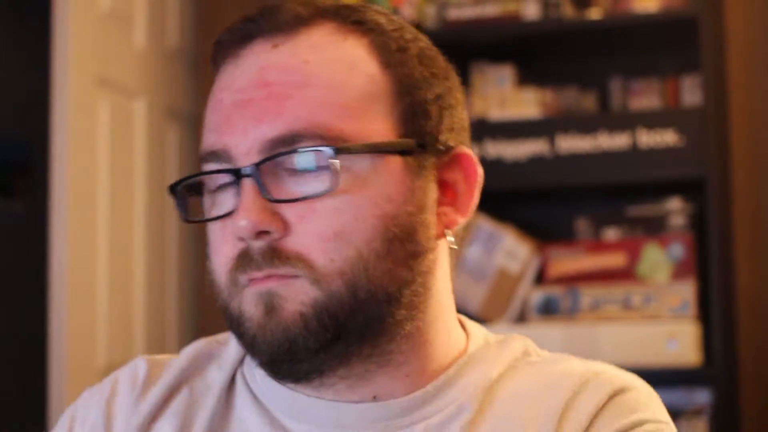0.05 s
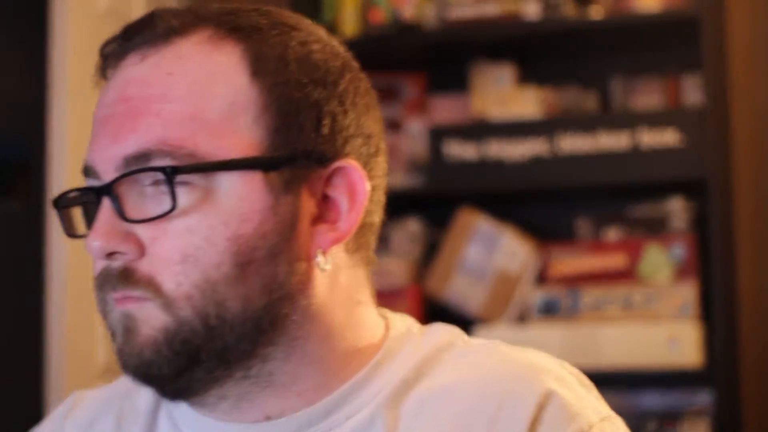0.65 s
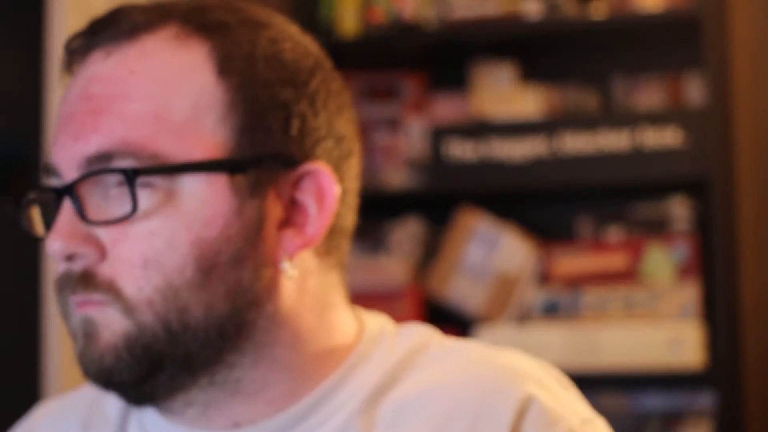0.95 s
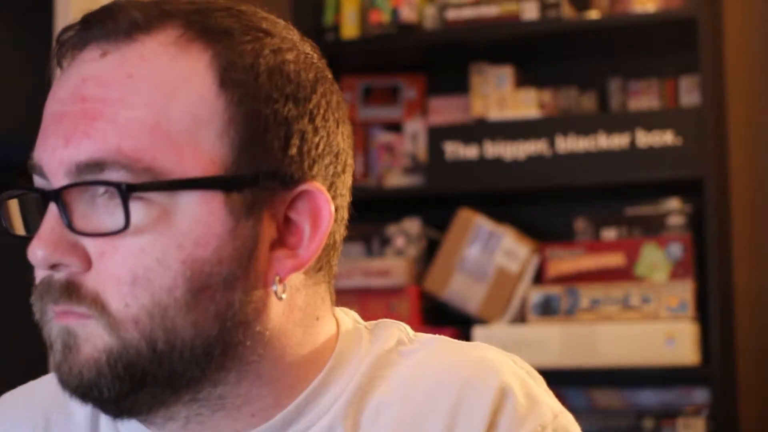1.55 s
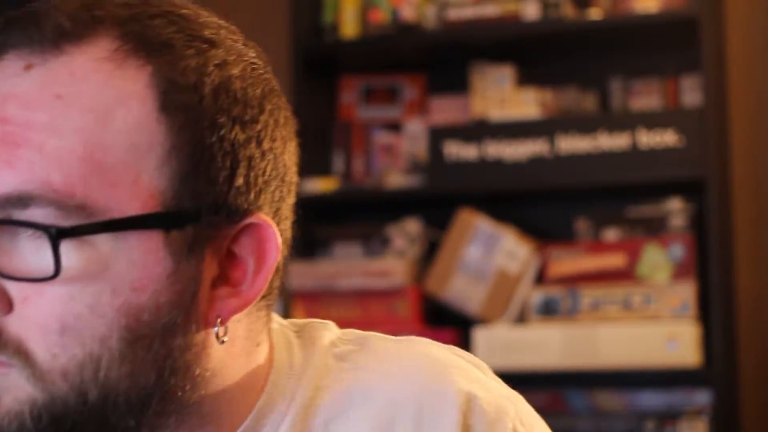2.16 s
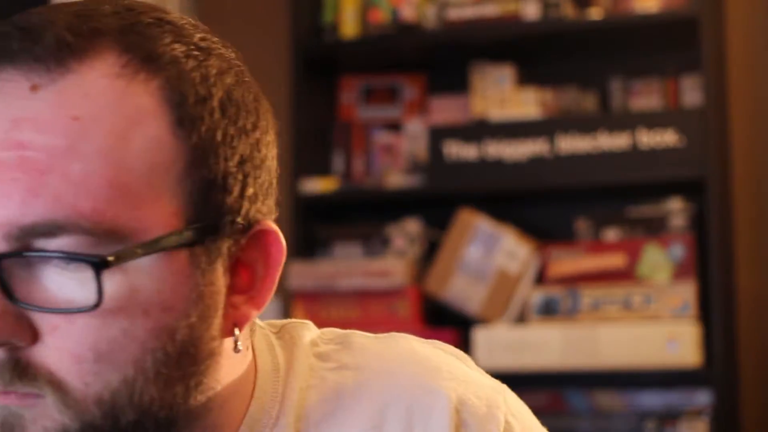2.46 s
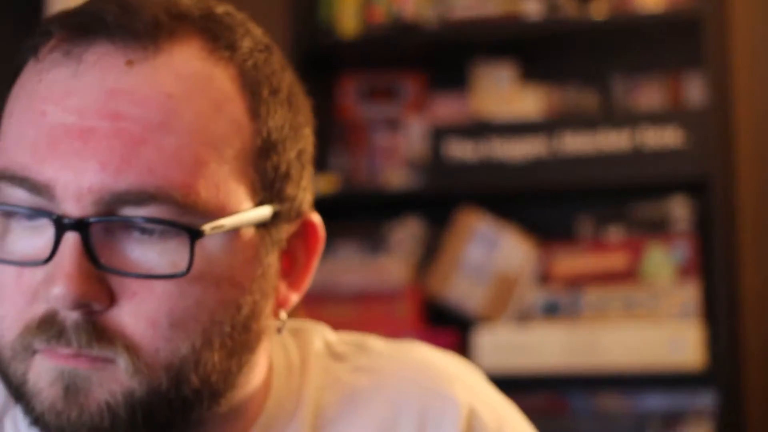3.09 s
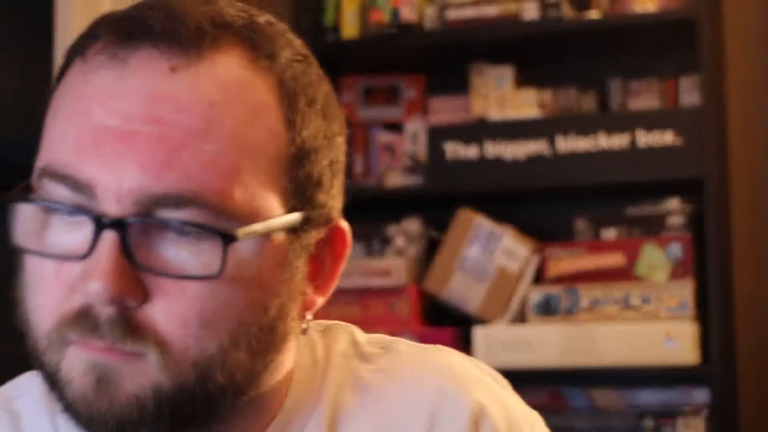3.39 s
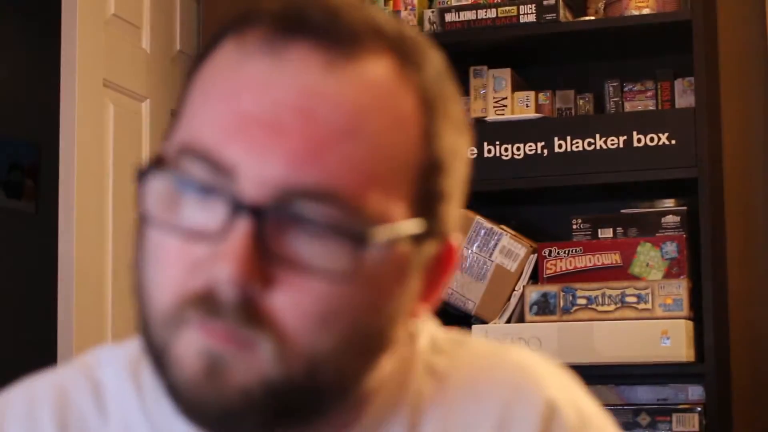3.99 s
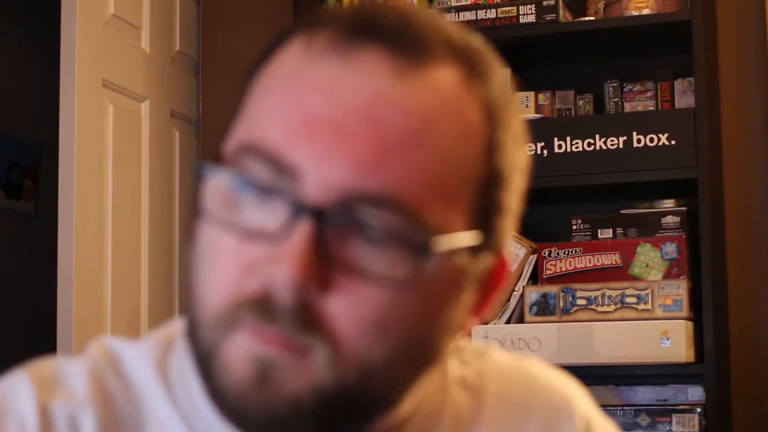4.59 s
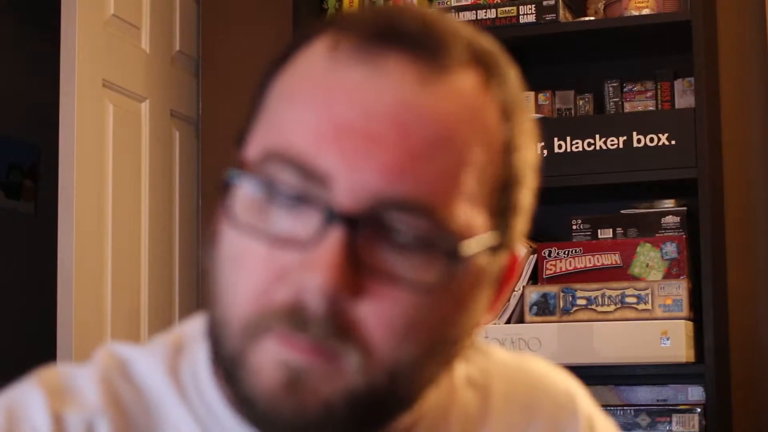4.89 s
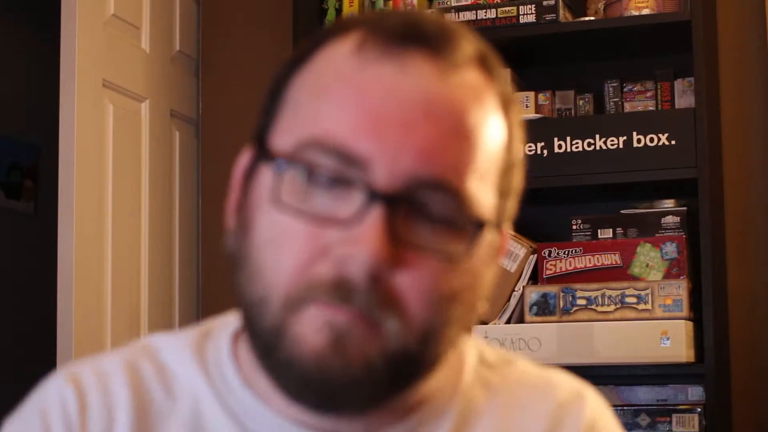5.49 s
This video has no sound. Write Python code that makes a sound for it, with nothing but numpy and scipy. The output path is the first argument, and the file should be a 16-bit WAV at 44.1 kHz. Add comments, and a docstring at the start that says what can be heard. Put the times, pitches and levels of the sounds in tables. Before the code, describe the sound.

A soft, low bump on a wooden table opens the sound, with a small metallic tink. A steel opener jingles in short, bright ticks from 0.2 to 0.4 seconds. At about 1.4 and 1.6 seconds it clinks against the cap and glass neck of a bottle, and at 1.7 seconds the cap snaps off sharply with a faint, thin hiss of gas. A firm knock on the tabletop comes at 2.6 seconds, then lighter taps and another firm knock at 3 seconds, which runs into a quick chatter of glass and metal until 3.2 seconds. After a quiet stretch with a faint tap or two, the cap is laid on the wood with light clacks around 5 seconds, followed by faint sliding until about 5.5 seconds. Everything sounds close, in a small room with a short tail and a soft, steady fan hum.

```python
"""A table in a small furnished room, where a beer bottle is opened.
A steel opener jingles, clinks against the crown cap and snaps it off with a wisp of gas.
Glass and metal then knock, chatter and slide on the wooden top. Each hard contact is a set of
ringing modes plus a short noise crack; soft bumps sway the table's lowest modes.
The room adds a short tail, and a fan hums softly underneath."""
import sys
import numpy as np
from scipy import signal
from scipy.fft import rfft, irfft, next_fast_len
from scipy.io import wavfile
from scipy.ndimage import uniform_filter1d

SR = 44100
rng = np.random.default_rng(int(sys.argv[2]) if len(sys.argv) > 2 else 0)


def inscribe(sig):
    """Save sig as 16-bit PCM at rate SR to the path in sys.argv[1].

    A 1-D sig is mono; a 2-D sig holds one channel per row.
    Samples are clipped to [-1, 1] before scaling.
    """
    pcm = np.round(np.clip(np.atleast_2d(sig).T, -1, 1) * 32767)
    wavfile.write(sys.argv[1], SR, pcm.astype(np.int16))


N = 253354
AGE = np.arange(SR // 2) / SR  # seconds since a hit

# EQ points of a hit (low, middle, high, top): low_db, high_db and top_db are relative to the middle
METAL_EQ_HZ, WOOD_EQ_HZ = (2500, 4800, 8500, 14000), (300, 1200, 3200, 9000)
# spectrum of the crack when the opener hits: freq_hz, level_db
STEEL_CRACK = [(200, -4), (1200, -7.5), (1900, 1.5), (3000, 1.5), (3600, -1.5), (4900, 4.5), (6800, -23),
               (8400, -2), (9800, -10), (10800, -21), (12000, -17), (16000, -17.5)]


def from_db(db):
    """Decibels to gain."""
    return 10 ** (np.asarray(db) / 20)


def at_hz(points, hz):
    """Read a table along a log-frequency axis."""
    known_hz, values = np.transpose(points)
    return np.interp(np.log(np.maximum(hz, 1)), np.log(known_hz), values)


def decay(t60):
    """An envelope that falls 60 dB in t60 seconds."""
    return np.exp(-np.log(1000) * AGE / max(t60, 1e-4))


def ring(hz, t60):
    """One struck mode: a decaying sine."""
    return np.sin(2 * np.pi * hz * AGE) * decay(t60)


def eq(x, spectrum):
    """Minimum-phase EQ, so that nothing rings ahead of an attack."""
    size = 2 * next_fast_len(len(x) // 2 + 2048)
    gain = from_db(at_hz(spectrum, np.fft.rfftfreq(size, 1 / SR)))
    cepstrum = irfft(np.log(gain))
    cepstrum[1:size // 2] *= 2
    cepstrum[size // 2 + 1:] = 0
    return irfft(rfft(x, size) * np.exp(rfft(cepstrum)))[:len(x)]


def noise(spectrum):
    """Steady coloured noise of rms 1."""
    x = eq(rng.standard_normal(N), spectrum)
    return x / x.std()


def flatten(x):
    """Level out broad peaks, so that a noise burst has no pitch of its own; energy 1."""
    hz = np.fft.rfftfreq(len(x), 1 / SR)
    power = uniform_filter1d(np.abs(rfft(x)) ** 2, size=40)
    power = np.maximum(power, power.mean() / 20)
    flat = eq(x, np.column_stack([hz + 1, -10 * np.log10(power)]))
    return flat / np.sqrt(np.sum(flat ** 2))


def unit_attack(x):
    """Scale to rms 1 over the first 4 ms."""
    return x / np.sqrt(np.mean(x[:SR // 250] ** 2))


def add(track, start_s, sound):
    """Mix a sound into the track."""
    start = max(round(start_s * SR), 0)
    track[start:start + len(sound)] += sound[:N - start]


def strikes(hits, modes, crack, eq_hz, crack_db, crack_t60, radiate_hz):
    """Each hit rings a body's main modes; a noise crack stands for the dense, quickly damped ones."""
    partials = np.array([(-1) ** k * from_db(db) * ring(hz, t60) for k, (hz, db, t60) in enumerate(modes)])
    # a body radiates little at wavelengths longer than itself
    radiation = signal.butter(2, radiate_hz, "high", fs=SR, output="sos")
    out = np.zeros(N)
    for start_s, level_db, low_db, high_db, top_db in hits:
        body = from_db(rng.standard_normal(len(modes))) @ partials
        burst = flatten(rng.standard_normal(len(AGE)) * decay(crack_t60))
        transient = from_db(crack_db) * unit_attack(eq(burst, crack))
        hit = signal.sosfilt(radiation, unit_attack(body) + transient)
        # where and how hard the contact lands sets its tone
        hit = eq(hit, list(zip(eq_hz, (low_db, 0, high_db, top_db))))
        add(out, start_s, from_db(level_db) * unit_attack(hit))
    return out


def cap_snap():
    """The cap snaps off the neck and rattles in the opener."""
    # snap and rattle: start_s, level_db, low_db, high_db, top_db
    hits = [(1.7016, -21.5, 2, -0.5, 3), (1.7050, -25, -1.5, 2, -6), (1.7182, -33, 10, 10, 1)]
    # modes of the freed cap: pitch_hz, level_db, t60_s
    modes = [(2000, -7, 0.014), (2750, -8, 0.011), (3150, -7, 0.016), (4260, -1.5, 0.018),
             (4640, -0.5, 0.019), (5170, 1.5, 0.018), (7250, -5, 0.0075), (7800, -17, 0.012),
             (8320, -9, 0.016), (10600, -11, .008), (12200, -16, .006), (13400, -12, .006)]
    # crack of the cap letting go: freq_hz, level_db
    crack = [(200, -33), (900, -20), (1500, -4), (2200, 2), (5300, -6), (6200, -5), (7800, -1),
             (9500, -8.5), (12500, -10), (15000, -26)]
    return strikes(hits, modes, crack, METAL_EQ_HZ, crack_db=-5, crack_t60=0.0074, radiate_hz=900)


def gas_wisp():
    """Gas escapes as the seal gives: a thin, high hiss that fades as the pressure drops."""
    # escaping gas: start_s, level_db, t60_s
    wisps = [(1.663, -51, 0.26)]
    # spectrum of the hiss: freq_hz, level_db
    hiss = [(1000, -25), (9000, -7), (12000, -7), (15000, -2)]
    flow = np.zeros(N)
    for start_s, level_db, t60 in wisps:
        add(flow, start_s, from_db(level_db) * decay(t60))
    return flow * noise(hiss)


def neck_clinks():
    """The opener clinks against the cap and the glass neck."""
    # clinks: start_s, level_db, low_db, high_db, top_db
    hits = [(1.4078, -25, 5, 7.5, 3), (1.4881, -41, 3, -1, -4), (1.5577, -28.5, 3, -6, 6),
            (1.6614, -44, 6, -13, 21), (1.6692, -43, -7, -19, -9), (1.6958, -42, 10, 4, 4)]
    # modes of the capped neck: pitch_hz, level_db, t60_s
    modes = [(1942, -9.5, 0.023), (2780, -2.5, 0.012), (3100, -6, 0.012), (4220, -6, 0.018),
             (4900, -1, 0.016), (5700, -5.5, 0.01), (6320, -10, 0.017), (7400, -10.5, 0.013),
             (7860, -9, 0.01), (8360, -1.5, 0.01), (10660, -10.5, 0.012), (12000, -12, 0.0067),
             (13500, -16, .008), (3100, -43, 0.077), (5000, -30, 0.1)]
    return strikes(hits, modes, STEEL_CRACK, METAL_EQ_HZ, crack_db=-4.5, crack_t60=0.0098, radiate_hz=1400)


def opener_jingle():
    """The steel opener jingles in the hand in short, bright ticks."""
    # ticks: start_s, level_db, low_db, high_db, top_db
    hits = [(.0279, -45.5, 6.5, 5, 18), (.2265, -44, -5, 5.5, -19), (.3417, -28.5, -4.5, 5, -5),
            (.3548, -30.5, -1.5, -2, -15), (.3972, -36, -0.5, -4, -3), (.923, -52.5, 4, 5, -6),
            (1.138, -55.5, 7, 8, 26)]
    # modes of the opener: pitch_hz, level_db, t60_s
    modes = [(2150, -21, 0.02), (2720, -8, 0.0077), (3260, -14, 0.035), (4400, -22, 0.016),
             (4730, 6.5, 0.0094), (5100, -15, 0.016), (5000, -34, 0.14), (6900, -13, 0.0092),
             (7670, -11, 0.0074), (8300, -15, 0.014), (8940, -7.5, 0.016), (12200, -14, .01),
             (13000, -12, .01)]
    return strikes(hits, modes, STEEL_CRACK, METAL_EQ_HZ, crack_db=-6, crack_t60=0.02, radiate_hz=900)


def steel_rings():
    """Where the fingers do not damp them, opener and cap sing on in close modes that beat."""
    # brief high metal rings of opener and cap, each at its own pitch: start_s, level_db, pitch_hz, t60_s
    glints = [(0.2272, -33, 4350, 0.014), (.355, -30, 7500, 0.0075), (.3973, -34, 7600, 0.014),
              (1.408, -51, 8500, 0.076), (3.064, -42, 13700, 0.035)]
    # further rings of the cap, at cap_hz: start_s, level_db
    cap_rings = [(1.425, -46), (1.557, -44), (2.846, -46.5), (3.033, -44)]
    cap_hz, cap_t60 = 10840, 0.08
    detune_ratios = 1 + 0.0118 * np.linspace(-2, 2, 4)
    out = np.zeros(N)
    for start_s, level_db, hz, t60 in glints + [(s, db, cap_hz, cap_t60) for s, db in cap_rings]:
        shimmer = sum(ring(hz * ratio, t60) * rng.normal() for ratio in detune_ratios)
        add(out, start_s, from_db(level_db) * (ring(hz, t60) + 0.53 * shimmer))
    return out


def table_knocks():
    """Glass and metal land on the wooden top; some knocks chatter on in quick, weaker rebounds."""
    # knocks: start_s, level_db, low_db, high_db, top_db, rebounds (rounded to a count), gap_s
    knocks = [(2.1075, -41.5, -13, -13.5, -3, 0, 0), (2.6065, -17, -11.5, 3, -16, 2, 0.0052),
              (2.789, -40, 2, 10.5, 10, 2, .0165), (2.8348, -29, 8, 7.5, 7, 3, .011),
              (2.918, -50, -8, 11, 17, 0, 0), (2.9785, -43.5, 13.5, 1, -11, 0, 0),
              (3.0276, -16, 3, -4, -16, 2, .0095), (3.0528, -25, 8.5, 6.5, 15.5, 1, .008),
              (3.0715, -25, 1, 3.5, -12, 0, 0), (3.1036, -24.5, 2.5, -3, 8, 2, .0075),
              (3.137, -34.5, 10.5, 1, -9, 0, 0), (3.1625, -32, 6, -2, -24, -0.5, 0),
              (3.213, -40.5, 12.5, -6, -24, 2.5, .021), (3.677, -47.5, -1, -8, -1, 0, 0),
              (4.852, -51, 0, -15, -4, 0, 0), (5.359, -51, 1, -4, 0, 0.5, 0)]
    # modes of the table top: pitch_hz, level_db, t60_s
    modes = [(122, -38, 0.13), (268, -24, 0.076), (390, -23, 0.041), (451, -16, 0.09), (648, -13.5, 0.073),
             (803, -18, 0.037), (990, -26, 0.095), (1081, -7, 0.072), (1149, -12.5, 0.09),
             (1224, -18, 0.19), (1207, 3, 0.018), (1458, -1, 0.019), (1573, -18, 0.11), (1950, -24, 0.036),
             (2092, -13, 0.076), (2540, -6.5, 0.011), (2785, -5.5, 0.0089), (3270, -11.5, 0.011)]
    # crack of the wood: freq_hz, level_db
    crack = [(80, -27), (160, -13), (300, -2), (700, 2), (1400, 3.5), (3000, -6), (4000, -11), (5500, -17),
             (8000, -26), (15000, -34.5)]
    light_knock_db, first_loss_db, next_loss_db = -39, 2.5, 3
    gap_jitter, kept_tone, rebound_tone_db = 0.06, 0.41, (5, -2.5, 5)
    hits = []
    for start_s, level_db, low_db, high_db, top_db, rebounds, gap_s in knocks:
        hits.append((start_s, level_db, low_db, high_db, top_db))
        # a harder knock loses more on its first rebound
        first_db = level_db - first_loss_db - 0.36 * (level_db - light_knock_db)
        tone_db = kept_tone * np.array([low_db, high_db, top_db]) + rebound_tone_db
        gaps = gap_s * (1 + gap_jitter * rng.standard_normal(round(rebounds)))
        for k, delay_s in enumerate(np.cumsum(gaps)):
            hits.append((start_s + delay_s, first_db - next_loss_db * k, *tone_db))
    return strikes(hits, modes, crack, WOOD_EQ_HZ, crack_db=-2, crack_t60=0.02, radiate_hz=109)


def cap_clacks():
    """The cap is laid on the wood with a clack, more crack than ring."""
    # clacks: start_s, level_db, low_db, high_db, top_db
    hits = [(4.9862, -38.5, -5, -2.5, -1.5), (5.052, -51, 10, -11, -14), (5.1019, -34, 0, 6, 8),
            (5.105, -36.5, 0.21, -3, -11)]
    # modes of cap and wood together: pitch_hz, level_db, t60_s
    modes = [(947, -4, 0.067), (1294, -1, 0.057), (1620, -8, .025), (2380, -8, 0.013), (3870, -20, 0.012),
             (4734, 5, 0.03)]
    # crack of the cap meeting the wood: freq_hz, level_db
    crack = [(100, -26), (350, 0), (1300, 5.5), (3000, -2), (5000, -5.5), (6500, -14), (9000, -17),
             (11000, -29), (15000, -39)]
    return strikes(hits, modes, crack, WOOD_EQ_HZ, crack_db=6, crack_t60=0.042, radiate_hz=150)


def table_bumps():
    """An arm or a heavy landing sways the whole table in its lowest modes."""
    # soft blows: start_s, level_db
    bumps = [(.027, -29), (.046, -20.5), (3.052, -37), (3.1122, -42)]
    # modes of the swaying table: pitch_hz, level_db, t60_s
    modes = [(104.7, -2, 0.16), (145, -8.5, 0.21), (207.5, -18, 0.27), (440, -21, 0.092)]
    thud = sum(from_db(db) * ring(hz, t60) for hz, db, t60 in modes)
    out = np.zeros(N)
    for start_s, level_db in bumps:
        add(out, start_s, -from_db(level_db) * thud)
    radiation = signal.butter(2, 90, "high", fs=SR, output="sos")  # the top radiates little below 90 Hz
    return signal.sosfilt(radiation, out)


def metal_tink(start_s, level_db):
    """A bump rings a small metal part right by the listener."""
    # modes of the part: pitch_hz, level_db, t60_s
    modes = [(887, -5, 0.21), (970, -3, 0.07), (3252, -2.5, 0.1), (4340, -8, 0.055), (5840, -14, 0.047),
             (8600, -24, .05), (9700, -23, .05)]
    tink = sum(from_db(db) * ring(hz, t60) for hz, db, t60 in modes)
    out = np.zeros(N)
    add(out, start_s, from_db(level_db) * tink)
    return out


def table_slides():
    """Things slide a little on the wood: faint swells of friction noise."""
    # slides: centre_s, half_length_s, level_db
    slides = [(2.128, 0.12, -61.5), (5.255, 0.028, -59), (5.394, 0.073, -62)]
    # spectrum of the friction: freq_hz, level_db
    friction = [(300, -4), (1300, 6), (2300, 3), (3400, -7), (4600, 1), (7000, -14), (15000, -26)]
    t = np.arange(N) / SR
    swells = sum(from_db(db) * np.exp(-((t - centre_s) / half_s) ** 2) for centre_s, half_s, db in slides)
    return swells * noise(friction)


def room(send, build_s):
    """A few early reflections and a short diffuse tail that lingers longest in the bass."""
    # tone of the tail: freq_hz, level_db
    tail_tone = [(100, 17), (400, -0.5), (1200, -8), (2500, -5), (5000, -8), (9000, -8.5), (15000, -7.5)]
    # decay of the tail: freq_hz, t60_s
    tail_decay = [(100, 0.31), (400, 0.15), (1200, 0.21), (2500, 0.24), (5000, 0.23), (9000, 0.21),
                  (15000, 0.11)]
    # reflections off nearby surfaces: delay_s, level_db
    reflections = [(.0013, -40), (.0075, -17), (0.0154, -14.5)]
    tail, edges_hz = np.zeros(len(AGE)), np.geomspace(70, 19000, 13)
    for low, high in zip(edges_hz, edges_hz[1:]):
        bandpass = signal.butter(2, [low, high], "band", fs=SR, output="sos")
        band = signal.sosfilt(bandpass, rng.standard_normal(len(AGE)))
        tail += band * decay(at_hz(tail_decay, np.sqrt(low * high)))
    fade_in = 1 - np.exp(-(AGE / build_s) ** 2)
    response = eq(flatten(tail * fade_in), tail_tone)
    for delay_s, db in reflections:
        response[round(delay_s * SR)] += from_db(db)
    return signal.fftconvolve(send, response)[:N]


def fan(air_db):
    """A steady bed of airy noise with a few low motor tones."""
    # spectrum of the moving air: freq_hz, level_db
    air = [(60, -7), (100, 1.5), (190, -0.5), (320, -0.5), (450, -9), (620, -5.5), (830, -15), (1130, -6.5),
           (1350, -10), (1800, -19), (3000, -21), (6000, -22.5), (10000, -23), (16000, -24)]
    # motor tones: pitch_hz, rms_db
    tones = [(91.5, -64.5), (95.3, -74.5), (151, -67.5), (312, -69.5)]
    t = np.arange(N) / SR
    hum = sum(np.sqrt(2) * from_db(db) * np.sin(2 * np.pi * (hz * t + rng.random())) for hz, db in tones)
    return from_db(air_db) * noise(air) + hum


def scene():
    """Opener, cap and knocks feed the room; the close sounds stay dry; the fan lies underneath."""
    # how the table top radiates into the room, as a send EQ: freq_hz, level_db
    table_send = [(150, -1.5), (500, 1), (1200, -0.5), (2000, 1.5), (3200, -3), (5000, 5), (7000, 4.5)]
    opening = opener_jingle() + neck_clinks() + cap_snap()
    knocks = table_knocks()
    metal_and_gas = opening + cap_clacks() + steel_rings() + gas_wisp()
    reverb = room(metal_and_gas + eq(knocks, table_send), build_s=0.0039)
    close = table_bumps() + metal_tink(start_s=0.028, level_db=-39) + table_slides()
    return (metal_and_gas + knocks + reverb + close + fan(air_db=-56))[None]


def record(dry):
    """Steep cuts below 84 Hz and above 16.2 kHz."""
    low_cut = signal.ellip(7, .5, 42, 84, "high", fs=SR, output="sos")
    high_cut = signal.ellip(10, .2, 70, 16200, fs=SR, output="sos")
    return signal.sosfilt(high_cut, signal.sosfilt(low_cut, dry))


dry = scene()
out = record(dry)
inscribe(out)
```